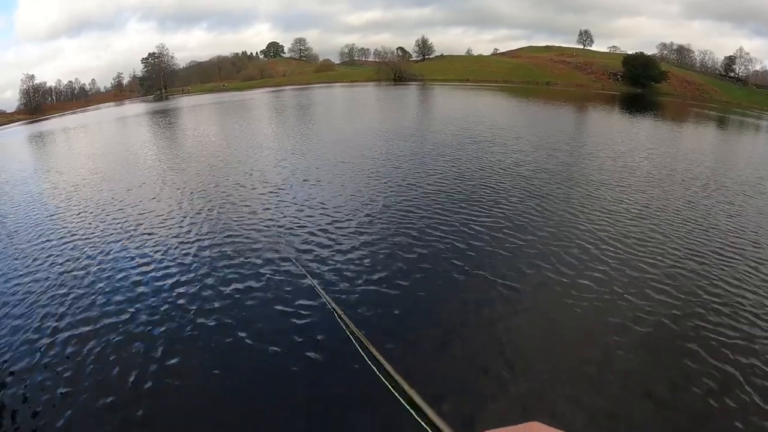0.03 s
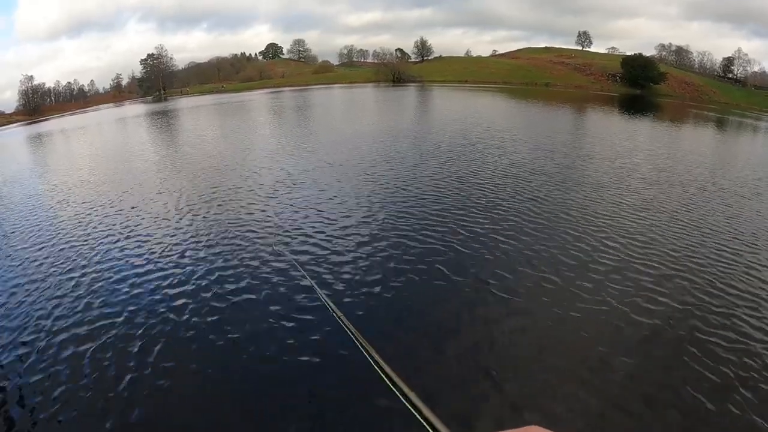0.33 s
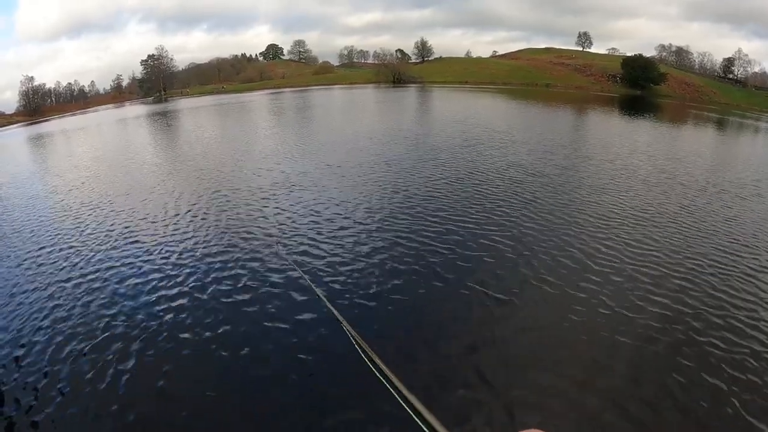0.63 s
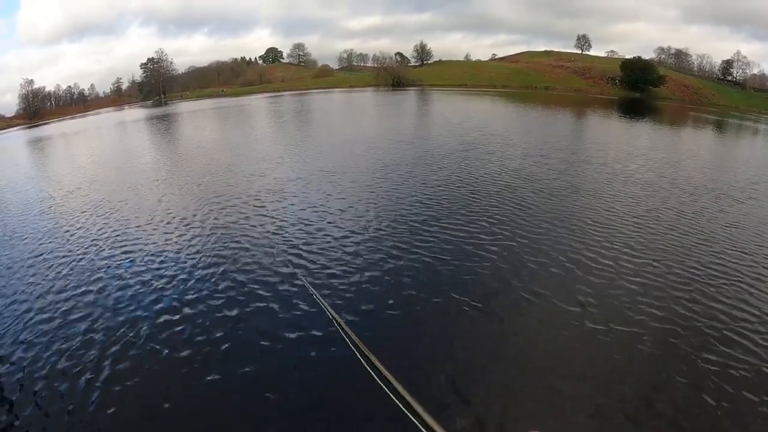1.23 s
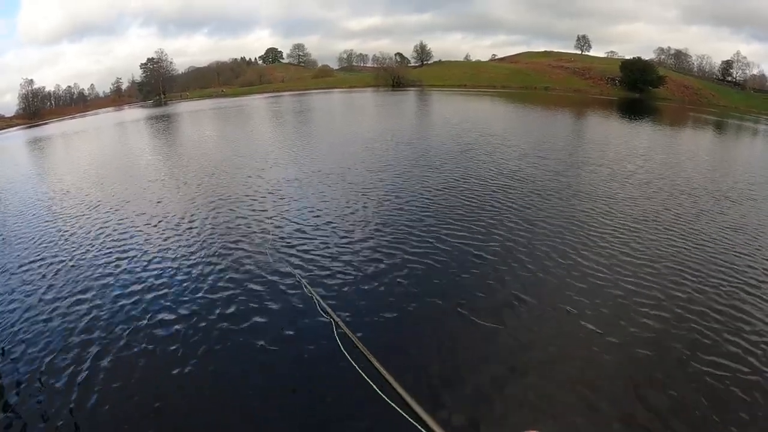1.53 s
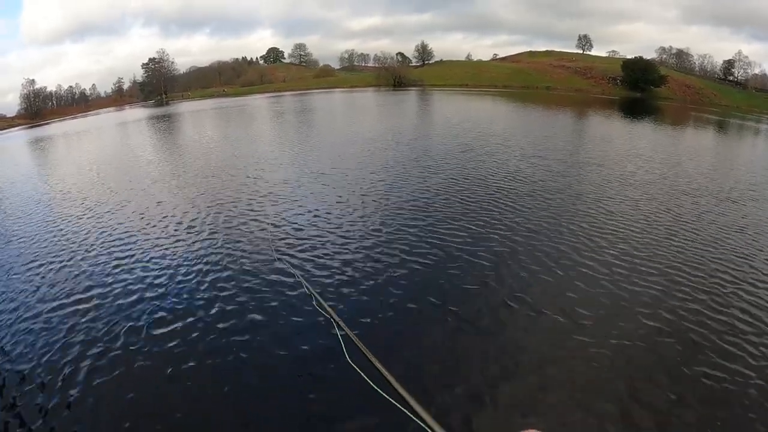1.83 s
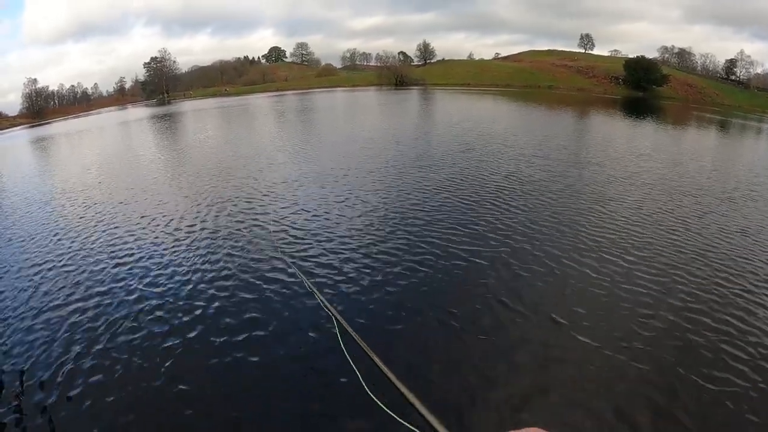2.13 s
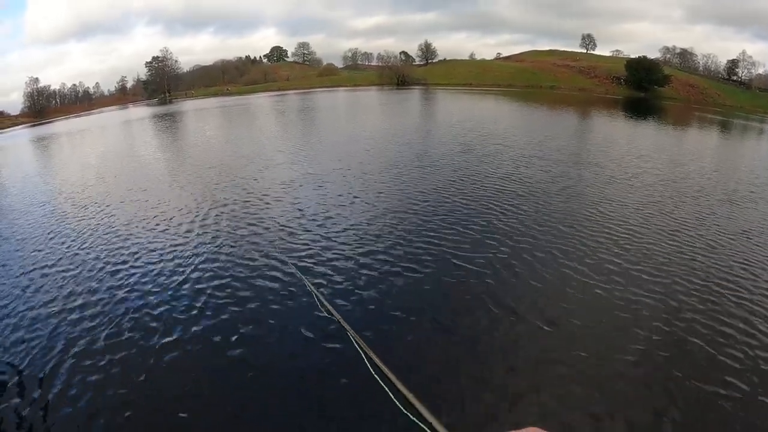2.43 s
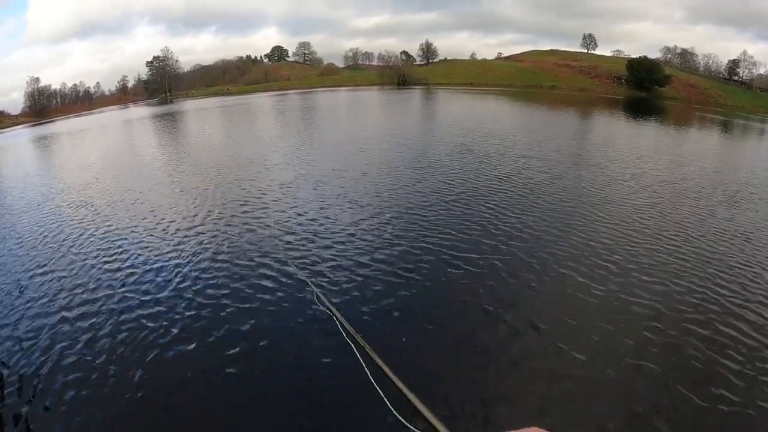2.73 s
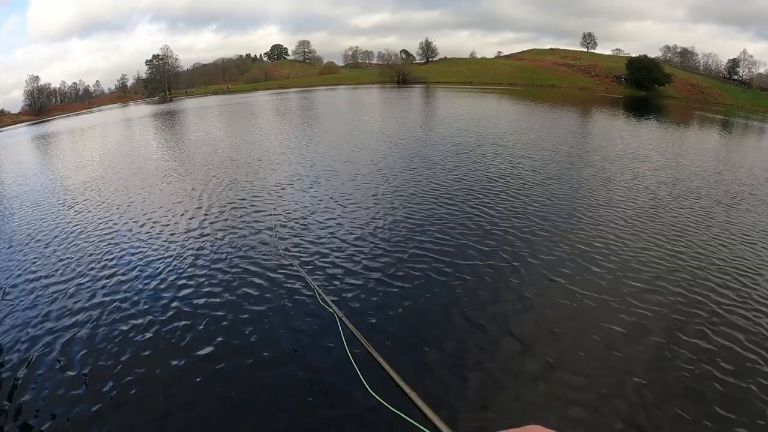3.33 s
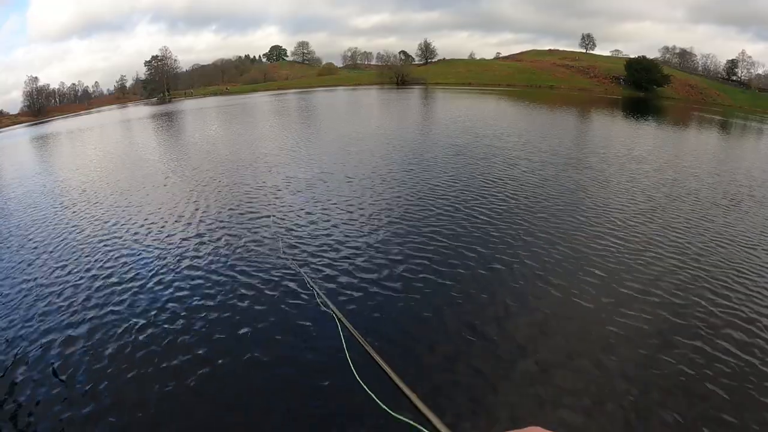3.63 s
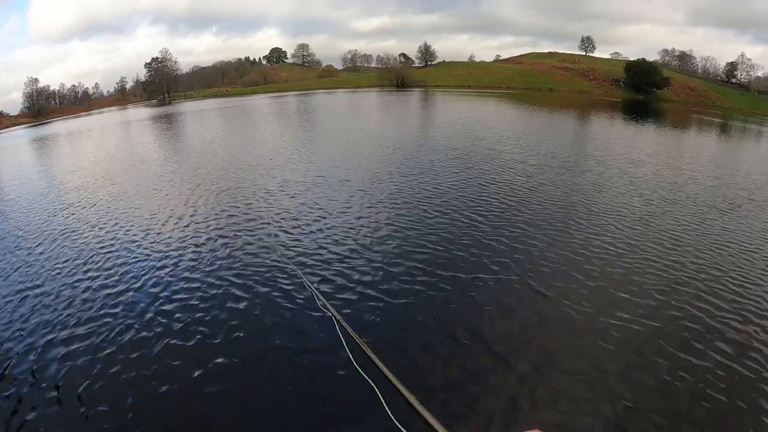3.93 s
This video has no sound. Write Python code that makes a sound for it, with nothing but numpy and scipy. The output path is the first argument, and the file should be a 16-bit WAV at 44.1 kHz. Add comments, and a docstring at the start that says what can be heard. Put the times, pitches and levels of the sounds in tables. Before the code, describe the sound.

Fishing line is pulled in by hand close to the microphone, about three raspy swishes a second, often with a small tick. Gusty wind rumbles and thumps throughout, mostly on the right, over faint lake ripples.

```python
"""At a lake, a fly line is stripped in by hand, about three pulls a second, close to the microphones.
Each pull rasps the line through the rod rings, often with a tick as it snaps taut; between pulls the
hand slides softly back. Gusty wind rumbles and thumps on the microphones, mostly on the right,
over a faint wash of ripples."""
import sys
import numpy as np
from scipy import signal
from scipy.fft import rfft, irfft
from scipy.io import wavfile
from scipy.ndimage import uniform_filter1d

SR = 44100
rng = np.random.default_rng(int(sys.argv[2]) if len(sys.argv) > 2 else 0)


def wav_record(signal):
    """Record a signal, one row per channel, as 16-bit PCM in the file named by sys.argv[1]."""
    frames = np.transpose(np.atleast_2d(signal))
    bounded = np.clip(frames, -1, 1)
    # unit amplitude maps onto the largest positive 16-bit level
    quanta = np.round(bounded * 32767).astype(np.int16)
    wavfile.write(sys.argv[1], SR, quanta)


N = 176400
T = np.arange(N) / SR
HZ = np.fft.rfftfreq(N, 1 / SR)

# Hardest wind buffets. Each row: time in seconds, level in dB, width in ms.
WIND_BUFFETS = [(.016, -14, 0.88), (0.054, -12.5, 0.96), (0.116, -8.5, 1.22), (.131, -11.5, 0.76),
                (.378, -14.5, 1.14), (0.424, -9, 1.76), (0.444, -22, 0.86), (.493, -6, 1.78),
                (0.527, -9.5, 1.44), (0.55, -6, 2.3), (0.598, -9.5, 1.07), (0.649, -7.5, 1.56),
                (0.723, -5.5, 1.26), (.86, -5.5, 2.08), (0.984, -15, 2.2), (1.038, -13, 1.2),
                (1.075, -10, 2.6), (1.103, -23, .7), (1.106, -10, 1.97), (1.203, -5, 1.8),
                (1.217, -5.5, 1.15), (1.252, -15.5, 1.65), (1.367, -21, 1.3), (1.469, -14.5, 1.53),
                (1.826, -10, 3.5), (1.937, -10.5, 2), (2.062, -10, 1.39), (2.084, -7.5, 1.75),
                (2.099, -13.5, 1.89), (2.21, -7.5, 2.6), (2.298, -12.5, 2), (2.33, -6, 2.6),
                (2.355, -4.5, 1.92), (2.43, -13, 1.72), (2.506, -16, 1.28), (2.825, -13.5, 3.5),
                (2.885, -10.5, 1.8), (2.934, -15, 2.1), (2.992, -6.5, 1.68), (3.06, -8.5, 2.07),
                (3.075, -5.5, 1.41), (3.174, -14, 1.04), (3.232, -10.5, 1.34), (3.251, -8, 1.42),
                (3.299, -18, 1.1), (3.327, -13, 1.14), (3.339, -9, 1.3), (3.415, -17, 3.1),
                (3.438, -14, 1.57), (3.46, -14.5, 1.27), (3.511, -12.5, 1.2), (3.568, -7.5, 1.39),
                (3.588, -7.5, 1.13), (3.714, -9.5, 1.29), (3.782, -19.5, 1.06), (3.828, -9, 1.06),
                (3.86, -7, 1.49), (3.959, -16, 1.12)]
# Wind flutter strength. Each row: time in seconds, level in dB.
GUST_DB = [(0, -27), (.17, -25.5), (.23, -42.5), (.345, -43), (.39, -22.5), (.76, -24), (.92, -30),
           (1.08, -30.5), (1.16, -49.5), (1.24, -22.5), (1.36, -32), (1.45, -43.5), (1.61, -27),
           (1.67, -37), (1.78, -44.5), (1.81, -28), (2.01, -26.5), (2.12, -25), (2.26, -32), (2.37, -28.5),
           (2.47, -33.5), (2.53, -25), (2.62, -36.5), (2.79, -32.5), (2.85, -44), (2.91, -28.5), (3.3, -25),
           (3.8, -23), (4, -25)]
# Rumble envelope. Each row: time in seconds, relative level in dB.
RUMBLE_ENVELOPE_DB = [(0.0, -18.5), (0.17, -26), (0.28, -39), (0.39, -26.5), (1.31, -24), (1.45, -35.5),
                      (1.47, -23), (1.53, -31.5), (1.57, -20), (1.88, -28), (1.9, -27), (2.06, -45),
                      (2.09, -22.5), (2.37, -25.5), (2.43, -15), (2.48, -32), (2.54, -19), (2.63, -33.5),
                      (2.76, -18), (2.78, -26), (3.16, -19.5), (3.19, -21), (3.35, -20.5), (3.48, -19.5),
                      (3.56, -17), (3.63, -17), (3.68, -16), (4.0, -31)]
# Rumble spectrum. Each row: frequency in Hz, relative density in dB.
RUMBLE_SPECTRUM_DB = [(10, -28.5), (25, -16), (45, -6.5), (72, -3), (115, -4.5), (180, -9.5), (260, -15.5),
                      (400, -35.5), (800, -91.5)]
# Shelter of the left microphone. Each row: frequency in Hz, left minus right in dB.
SHELTER_DB = [(25, 3), (60, -4), (110, -8), (200, -8), (370, -12), (670, -14.5), (1200, -22)]
# Ripples and distant air. Each row: frequency in Hz, relative density in dB.
LAKE_SPECTRUM_DB = [(100, 12.5), (450, 4.5), (700, -0.5), (850, -9.5), (1050, 3.5), (1500, 0), (2200, -5),
                    (3300, -10), (5500, -14), (7500, -18), (9000, -24), (12000, -28), (14000, -40.5)]
# Pulls of the line. Each row: start in seconds, length in seconds, relative level in dB.
LINE_PULLS = [(0.055, 0.16, -51), (0.376, 0.16, -50), (0.68, 0.16, -51), (0.998, 0.15, -50.5),
              (1.318, 0.16, -50.5), (1.649, 0.15, -50.5), (1.957, 0.15, -48.5), (2.277, 0.15, -47.5),
              (2.598, 0.15, -50.5), (2.921, 0.15, -49), (3.237, 0.14, -50.5), (3.539, 0.16, -50.5),
              (3.871, 0.13, -49.5)]
# Line rasping on rings and finger. Each row: frequency in Hz, relative density in dB.
RASP_SPECTRUM_DB = [(500, -2), (1500, -9), (2050, -9), (3000, -2), (4300, -6.5), (5600, -4.5), (6200, -13),
                    (6900, -14.5), (8000, -21), (9000, -24.5), (11400, -19.5), (12600, -33), (14000, -45)]
# Resonances the sliding line excites. Each row: centre in Hz, width in Hz, lift in dB.
RASP_RESONANCES = [(1635, 270, 5.5), (2414, 130, 7), (2880, 66, 3.5), (3480, 68, 4.5), (3716, 240, 8.5),
                   (4000, 390, 7.5), (4874, 330, 9), (6600, 180, 6)]
# Fizz of the line at full speed. Each row: frequency in Hz, relative density in dB.
FIZZ_SPECTRUM_DB = [(1000, -39), (3000, -15.5), (5500, 3), (6800, 0), (8000, -2.5), (9000, -9),
                    (11400, -6.5), (12700, -7), (14000, -17.5)]
# Hand sliding on the line. Each row: frequency in Hz, relative density in dB.
SLIDE_SPECTRUM_DB = [(800, 0), (2000, -6), (3700, -8.5), (5000, -5.5), (6500, -8.5), (7700, -10),
                     (8600, -19.5), (10800, -17), (12500, -27), (14000, -32)]
# Line hitting the rod, loud going taut, faint going slack. Each row: start in seconds, relative dB.
LINE_TICKS = [(.3205, -83), (0.387, -40), (.5342, -49), (0.5508, -50.5), (0.6987, -28), (1.0172, -39),
              (1.0219, -35.5), (1.1707, -48), (1.3328, -39), (1.5958, -50), (1.6635, -37), (1.6712, -31.5),
              (1.9759, -32.5), (2.292, -31), (2.3, -28), (2.4853, -48.5), (2.7549, -52), (2.767, -52),
              (2.945, -33), (3.0772, -48.5), (3.1264, -49), (3.255, -23.5), (3.2624, -31), (3.5573, -31),
              (3.885, -26)]
# Tick spectrum. Each row: frequency in Hz, relative density in dB.
TICK_SPECTRUM_DB = [(600, -24), (1600, 1.5), (2400, -2.5), (3600, -13.5), (5000, 9), (6300, -2),
                    (8000, -15.5), (12000, -18.5), (14500, -26.5)]
# Likeness of the line at the two microphones. Each row: frequency in Hz, correlation (capped at 1).
LINE_CORRELATION = [(1000, 0.9), (2000, 0.85), (2900, 0.33), (4000, 1.16), (6200, 0.8), (9000, 0.6),
                    (13600, 1.7)]
# Line balance. Each row: frequency in Hz, left minus right in dB.
LINE_PAN_DB = [(1000, -2.5), (1700, 0), (2300, 0), (3200, -5), (3750, -1), (4350, -5.5), (5000, -.5),
               (7400, 1.5), (10000, 2), (12000, 5)]
# Reflections off arm, chest and rod. Each row: delay in seconds, gain.
BODY_ECHOES = [(.0019, .06), (.0047, 0.072), (.0083, .09), (0.0115, .08)]


def amp(db):
    """Decibels to gain."""
    return 10 ** (np.asarray(db) / 20)


def unit(x):
    """Scale to rms 1."""
    return x / np.sqrt(np.mean(x ** 2) + 1e-20)


def spectrum(points):
    """Interpolate (Hz, value) points over log frequency."""
    hz, value = np.transpose(points)
    return np.interp(np.log(HZ + 1), np.log(hz + 1), value)


def curve(points, time_s):
    """Interpolate (seconds, value) points."""
    return np.interp(time_s, *np.transpose(points))


def colour(x, db):
    """Filter by a dB spectrum, keeping the power of white noise."""
    return irfft(rfft(x) * unit(amp(db)), N)


def delay(lag_s):
    """Frequency response of a delay."""
    return np.exp(-2j * np.pi * HZ * lag_s)


def wobble(rate_hz):
    """Smooth random drift, rms 1."""
    return unit(irfft(rfft(rng.standard_normal(N)) / (1 + (HZ / rate_hz) ** 4), N))


def correlate(stereo, correlation):
    """Make two independent channels partly alike."""
    left, right = rfft(stereo)
    shared = np.clip(correlation, 0, 1)
    return irfft(np.array([left, shared * left + np.sqrt(1 - shared ** 2) * right]), N)


def ramp(u):
    """Smooth step from 0 to 1."""
    return np.sin(np.pi / 2 * np.clip(u, 0, 1)) ** 2


def add_eddy(mix, time_s, gain, width_ms, phase_turns, order):
    """One eddy passing the microphone: a pressure swing, brighter if narrow; more swings at high order."""
    centre = int(time_s * SR)
    near = slice(max(centre - SR // 20, 0), centre + SR // 20)
    offset_ms = (T[near] - time_s) * 1000
    swing = np.exp(2j * np.pi * phase_turns) / (1 - 1j * offset_ms / width_ms) ** order
    mix[near] += gain * swing.real


def flutter(eddies_per_s=220, base_width_ms=2.757, base_gust_db=-27.5, halving_db=25):
    """A stream of eddies that shrink as the gust grows."""
    eddies = np.zeros(N)
    for _ in range(int(eddies_per_s * N / SR)):
        time_s = rng.uniform(0, N / SR)
        shrink = 2 ** ((base_gust_db - curve(GUST_DB, time_s)) / halving_db)
        width_ms = base_width_ms * shrink * np.exp(rng.uniform(-0.33, 0.33))
        add_eddy(eddies, time_s, amp(rng.uniform(-6, 6)), width_ms, rng.random(), order=4.22)
    return unit(eddies) * amp(curve(GUST_DB, T) + 2.2 * wobble(rate_hz=30))


def wind():
    """Buffets, lumpy rumble and flutter; weaker and duller at the sheltered left microphone."""
    buffets = np.zeros(N)
    for time_s, db, width_ms in WIND_BUFFETS:
        add_eddy(buffets, time_s, amp(db), width_ms, rng.random(), order=2.51)
    rumble = colour(rng.standard_normal((2, N)), spectrum(RUMBLE_SPECTRUM_DB))
    rumble *= amp(curve(RUMBLE_ENVELOPE_DB, T) - 1 + 2 * wobble(rate_hz=34))
    right = buffets + rumble[0] + flutter()
    left = irfft(rfft(right) * amp(spectrum(SHELTER_DB)) * delay(lag_s=0.0001), N)
    return np.array([left + amp(-19.5) * rumble[1], right])


def lake(level_db=-60):
    """Faint, wide wash of ripples."""
    noise = correlate(rng.standard_normal((2, N)), correlation=0.44)
    return amp(level_db + 0.44 * wobble(rate_hz=15)) * colour(noise, spectrum(LAKE_SPECTRUM_DB))


def friction(spread_db, slips_per_s=10000):
    """Dense tiny slips of uneven size, two channels."""
    size = amp(spread_db * np.minimum(rng.exponential(1, N), 5))
    slipping = rng.random(N) < slips_per_s / SR
    return unit(size * slipping * rng.standard_normal((2, N)))


def pulls(creep_s=0.014, rise_s=0.025, fall_s=0.04, sag_db=-2, arch_db=1.5):
    """The line creeps, speeds up, judders through the rings and stops; most fizz at full speed."""
    rasp_envelope, fizz_envelope = np.zeros((2, N))
    for start_s, length_s, db in LINE_PULLS:
        age_s = T - start_s
        progress = np.clip(age_s / length_s, 0, 1)
        attack = ramp(age_s / rise_s) + amp(-14) * ramp(age_s / creep_s + 1)
        release = ramp((length_s - age_s) / fall_s)
        envelope = amp(db + sag_db * (progress - 0.5)) * attack * release
        full_speed = np.exp(-0.5 * ((progress - 0.35) / 0.18) ** 2)
        rasp_envelope += envelope * amp(arch_db * (full_speed - 2.5))
        fizz_envelope += envelope * full_speed
    judder = amp(1.1 * wobble(rate_hz=110))
    lift_db = sum(db / (1 + (2 * (HZ - hz) / width_hz) ** 2) for hz, width_hz, db in RASP_RESONANCES)
    rasp = colour(friction(spread_db=1.5) * rasp_envelope * judder, spectrum(RASP_SPECTRUM_DB) + lift_db)
    fizz = colour(friction(spread_db=2) * fizz_envelope * judder, spectrum(FIZZ_SPECTRUM_DB))
    return rasp + amp(-15.5) * fizz


def slides(peak_after_s=0.096, width_s=0.035):
    """After each pull the fingers brush back along the slack line."""
    peaks_s = [start_s + length_s + peak_after_s for start_s, length_s, _ in LINE_PULLS]
    speed = sum(np.exp(-0.5 * ((T - peak_s) / width_s) ** 2) for peak_s in peaks_s)
    brush = friction(spread_db=2) * speed * amp(1.7 * wobble(rate_hz=70))
    return amp(-63.5) * colour(brush, spectrum(SLIDE_SPECTRUM_DB))


def ticks(rise_s=0.0013, decay_s=0.0015, trim_db=-0.5):
    """Short snaps of line against the rod."""
    envelope = np.zeros(N)
    for start_s, db in LINE_TICKS:
        age_s = np.maximum(T - start_s, 0)
        envelope += amp(db + trim_db) * ramp(age_s / rise_s) * np.exp(-age_s / decay_s)
    return colour(envelope * rng.choice([-1., 1.], (2, N)), spectrum(TICK_SPECTRUM_DB))


def wander(stereo, depth_db=2):
    """The running line's colour drifts in patches of about 500 Hz by 25 ms."""
    frames = signal.stft(stereo, nperseg=256)[2]
    patches = uniform_filter1d(rng.standard_normal(frames.shape[1:]), size=3, axis=0)
    patches = unit(uniform_filter1d(patches, size=9, axis=1))
    return signal.istft(frames * amp(depth_db * patches), nperseg=256)[1][:, :N]


def from_rod(stereo, left_lag_s=0.000012):
    """Path from the rod to two body-worn microphones, with close reflections."""
    half_pan_db = spectrum(LINE_PAN_DB) / 2
    microphones = np.array([amp(half_pan_db) * delay(left_lag_s), amp(-half_pan_db)])
    paths = 1 + sum(gain * delay(lag_s) for lag_s, gain in BODY_ECHOES)
    line = correlate(stereo, spectrum(LINE_CORRELATION))
    return irfft(rfft(line) * microphones * paths, N)


def scene():
    """Line, lake and wind together."""
    line = wander(pulls() + slides()) + ticks()
    return from_rod(line) + lake() + wind()


def record(dry):
    """Low-pass at 14.4 kHz."""
    lowpass = signal.firwin(301, 14400, window=("kaiser", 9), fs=SR)
    return signal.oaconvolve(dry, lowpass[None], "same")


dry = scene()
out = record(dry)
wav_record(out)
```